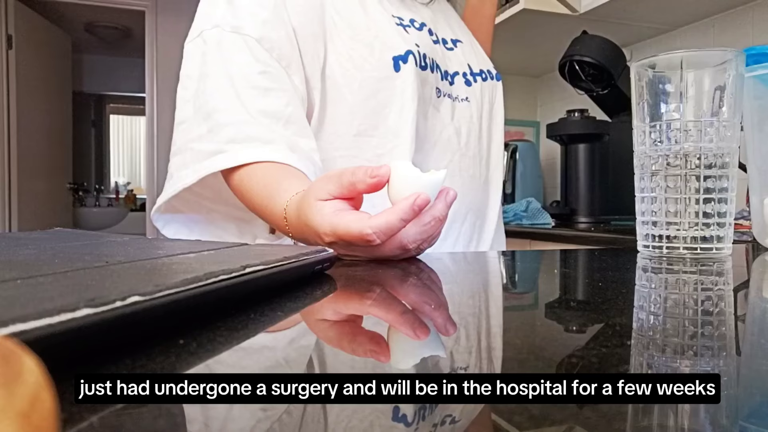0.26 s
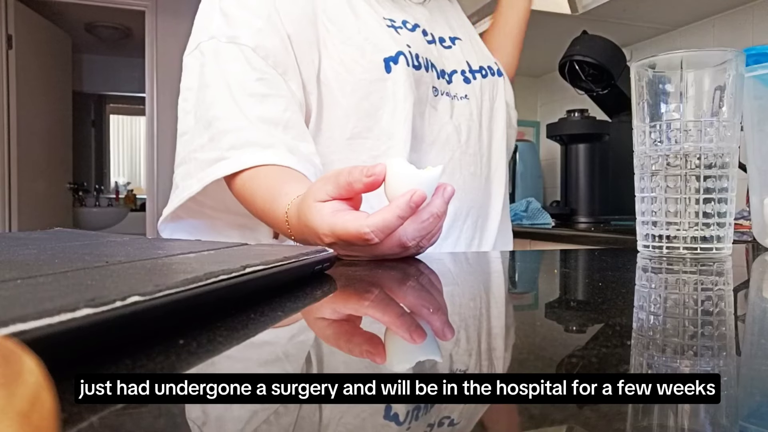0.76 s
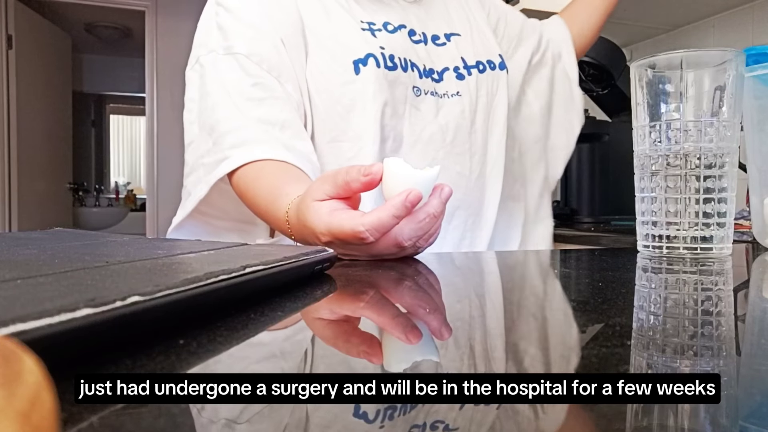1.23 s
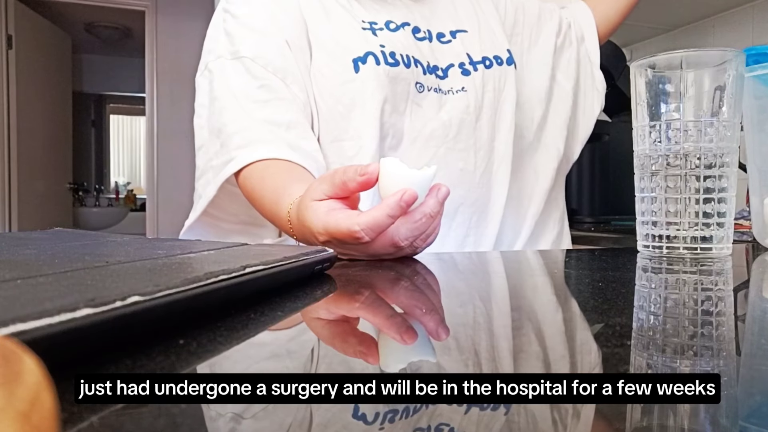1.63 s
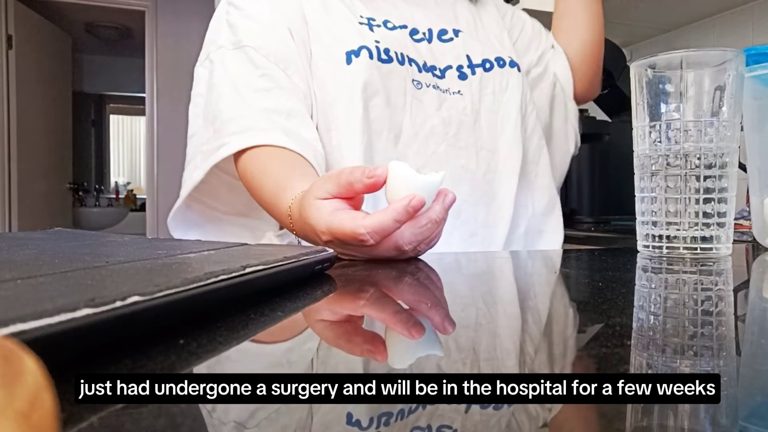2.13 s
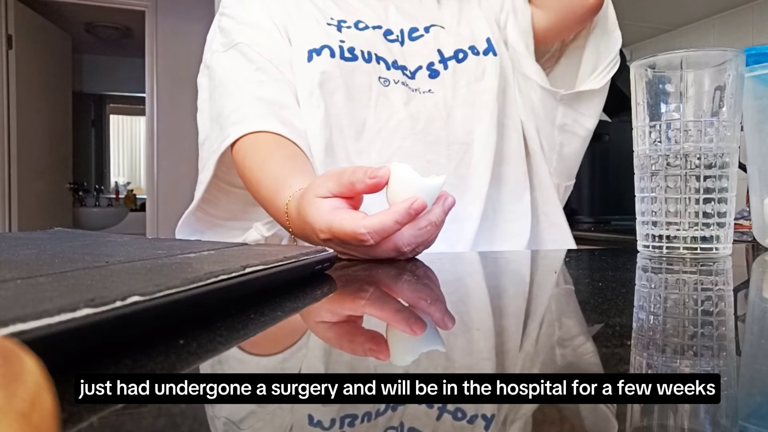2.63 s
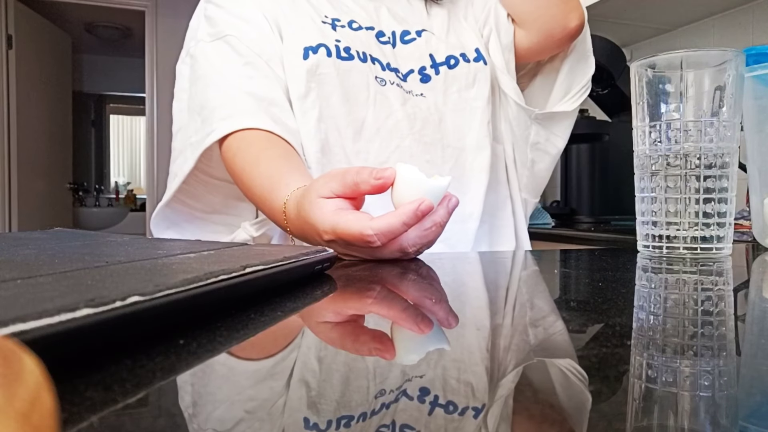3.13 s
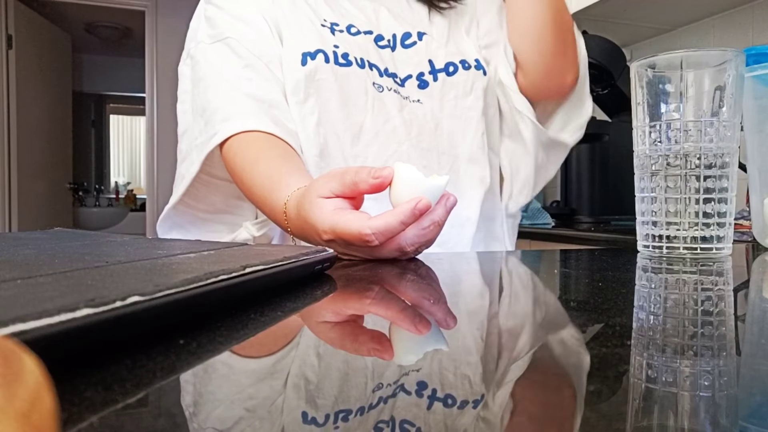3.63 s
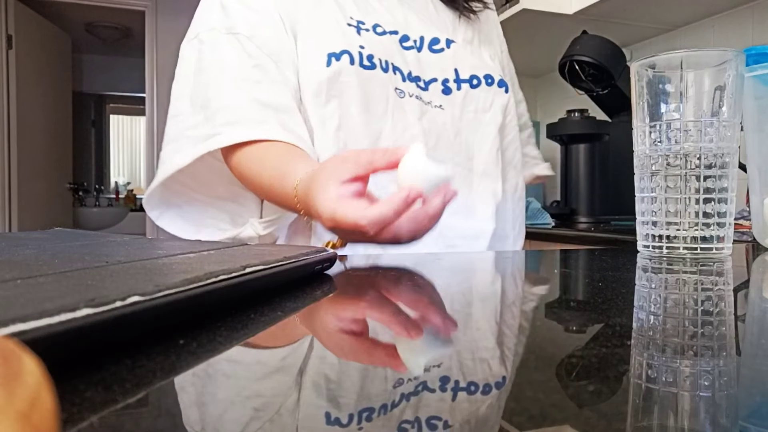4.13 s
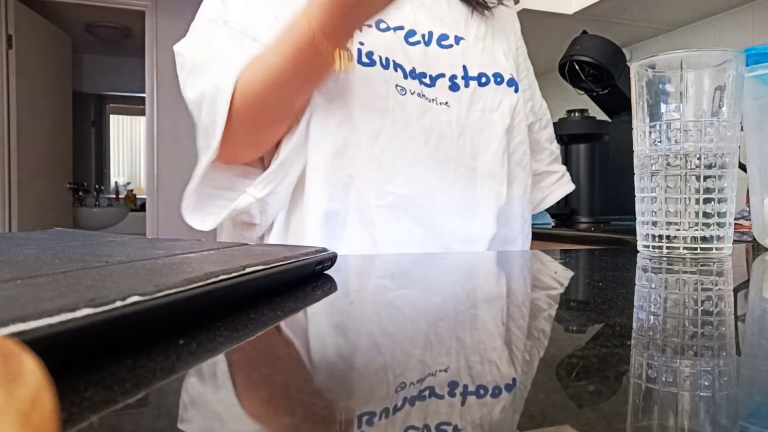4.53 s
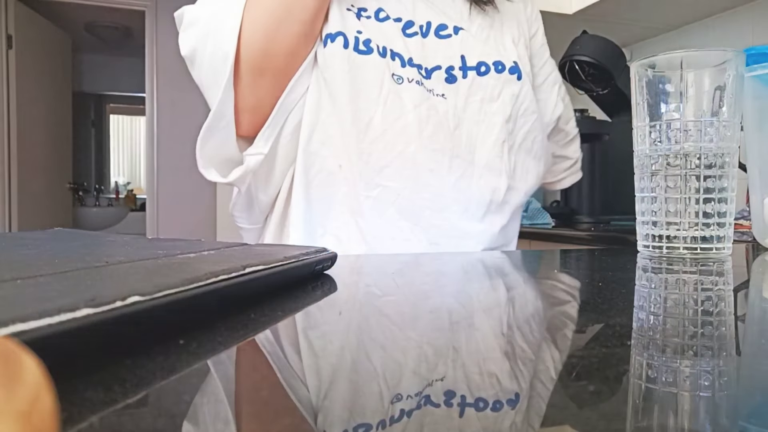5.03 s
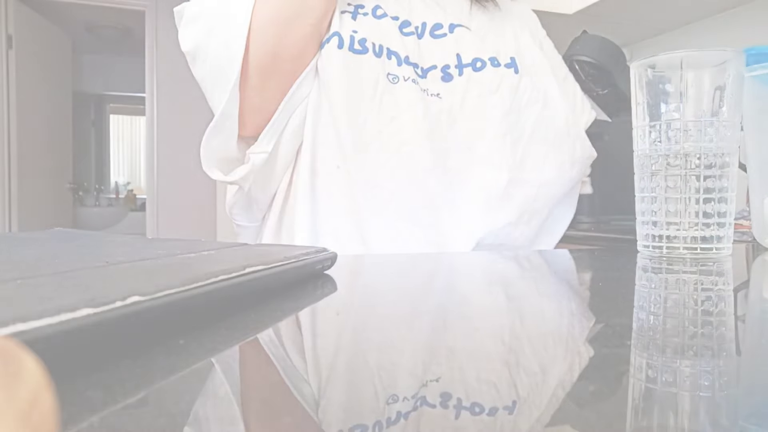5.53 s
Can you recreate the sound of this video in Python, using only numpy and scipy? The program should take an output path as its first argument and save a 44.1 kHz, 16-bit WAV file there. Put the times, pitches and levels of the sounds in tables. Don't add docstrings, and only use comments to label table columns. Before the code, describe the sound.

A quiet kitchen: soft low room air, faint hiss and a far appliance droning weakly, with one tiny tick near 0.3 s. At about 1.2 s come faint touches, then from 1.4 to 1.85 s a cupboard door drags with a gritty rasp, its latch knocks firmly at 1.46, 1.56 and 1.66 s, and the panel thuds low against its frame, ending with a dull thump at 1.82 s. After a short pause a small motor starts around 2.2 s, a low fluttering hum of roughly 28 beats a second. It steps up in speed at about 3.1 s, then hunts slightly, with a wavering casing tone near 310 Hz swelling and breaking off. Faint ticks and soft cloth rubs appear close by, busiest from 4.6 s. By 5.1 s the motor sounds strained, louder, rougher and more rattling, peaking near 5.3 s and easing slightly at the end, around 5.75 s, under a strong sleeve rustle.

```python
import sys
import numpy as np
from scipy import signal
from scipy.fft import rfft, irfft, next_fast_len
from scipy.io import wavfile
from scipy.ndimage import uniform_filter1d

SR = 44100
rng = np.random.default_rng(int(sys.argv[2]) if len(sys.argv) > 2 else 0)


def volts(x):
    e = np.asarray(x, float) / 20
    return 10 ** e


def wav_out(sig):
    wavfile.write(sys.argv[1], SR, np.round(np.clip(np.atleast_2d(sig).T, -1, 1) * 32767).astype(np.int16))


N = 254408


def rms_one(x):
    return x / np.sqrt(np.mean(x ** 2) + 1e-20)


def in_time(rows, silent=-120):
    s, *columns = np.transpose(rows)
    return [np.interp(np.arange(N) / SR, s, c, left=silent) for c in columns]


def swell(s, db, rise_db_s, fall_db_s, bite_db=200):
    t = np.arange(N) / SR - s
    rise_db = abs(rise_db_s) * t
    before_db = rise_db + 20 * np.minimum(rise_db + bite_db, 0)
    return volts(db + np.where(t < 0, before_db, -abs(fall_db_s) * t))


def drift(rate):
    r = np.exp(-80 * np.pi * rate / SR)
    slow = signal.lfilter([1], [1, -2 * r, r * r], rng.standard_normal(N // 40 + 2002))[2000:]
    return np.interp(np.arange(N) / 40, np.arange(len(slow)), rms_one(slow))


def tint(x, points):
    size = next_fast_len(N + SR // 4)
    hz = np.maximum(np.fft.rfftfreq(size, 1 / SR), 1)
    at, db = np.transpose(points)
    return irfft(rfft(x, size) * volts(np.interp(np.log(hz), np.log(at), db)), size)[..., :N]


def resonate(x, hz, width_hz):
    r = np.exp(-np.pi * max(width_hz, 1) / SR)
    poles = [1, -2 * r * np.cos(2 * np.pi * hz / SR), r * r]
    return signal.lfilter([(1 - r * r) / 2, 0, (r * r - 1) / 2], poles, x + 1e-18)


def body(x, modes):
    rings = ((-1) ** k * volts(db) * resonate(x, hz, width) for k, (hz, width, db) in enumerate(modes))
    return rms_one(sum(rings))


def add(out, s, sound):
    i = round(s * SR)
    out[..., i:i + sound.shape[-1]] += sound


# frequency in Hz, side level over middle level in dB.
WIDTH = [(60, -26), (150, -20.5), (380, -7), (950, 2), (2380, 0.5), (5980, 2.5), (15000, 1)]


def spread(x, t60, side_db=0):
    t = np.arange(SR // 2) / SR
    tail = rng.standard_normal(len(t)) * volts(-60 * t / t60)
    echo = signal.fftconvolve(x, tail / np.linalg.norm(tail))[:N]
    side = volts(side_db) * tint(echo, WIDTH)
    return np.array([x + side, x - side])


# frequency in Hz, level in dB per Hz.
AIR = [(15, -43), (25, -9), (97, -7.5), (119, -3), (146, -7.5), (167, -4.5), (189, -15), (209, -14),
       (248, -14.5), (290, -5.5), (350, -7), (468, -13), (659, -19), (1080, -18.5), (1500, -30),
       (1950, -36), (3300, -120)]
# frequency in Hz, level in dB per Hz.
FAR_HISS = [(880, -18.5), (1500, -8), (1950, -4), (2380, -3), (2860, -10.5), (2980, -9), (3590, -10),
            (4280, -20), (5150, -19), (6270, -29), (15600, -21)]
# pitch in Hz, level in dB, waver in dB.
DRONE = [(95.8, -79.5, 5.5), (169.1, -63, -1.5), (247.8, -70, 4), (344, -68, 3.5), (425.4, -74.5, 1.5),
         (1086, -81.5, 6), (2760, -88, -2.5)]


def kitchen():
    air_db, hiss_db = -61, -73
    mid, side = rng.standard_normal((2, N))
    side = tint(side, WIDTH)
    white = np.array([mid + side, mid - side])
    air = volts(air_db) * rms_one(tint(white, AIR))
    air += volts(hiss_db) * rms_one(tint(white, FAR_HISS))
    t = np.arange(N) / SR
    drone = np.zeros(N)
    for hz, db, waver_db in DRONE:
        level = volts(db + 3.5 + waver_db * drift(3.2))
        drone += level * np.sin(2 * np.pi * hz * t + 0.27 * waver_db * drift(0.79))
    return air + spread(drone, t60=0.41)


# frequency in Hz, level in dB per Hz.
CLOTH = [(1760, -37), (3000, -7.5), (4040, -3.5), (4700, -13.5), (5070, -28), (6020, -8.5), (6860, -6),
         (7560, -6.5), (9040, -7.5), (12400, -17), (13500, -8.5), (14800, -7), (15600, -18)]
# peak in seconds, level in dB, rise in dB per s, fall in dB per s.
RUBS = [
    (2.42, -78.5, 71, 68),
    (3.93, -74, 18, 20),
    (4.63, -72.5, 84, 9),
    (4.8, -68, 125, 72),
    (5.1, -79, 1.5, 8),
    (5.44, -66.5, 28.5, 75.5),
    (5.77, -65.5, 16, 7),
]
# start in seconds, peak in dB, pitch in Hz, left over right in dB,
# seconds to fall by 60 dB.
TICKS = [
    (0.288, -63.5, 7240, -11, 0.14),
    (2.6884, -70.5, 8450, 13.5, 0.087),
    (3.3034, -60, 8600, -5.5, 0.054),
    (3.715, -55, 14100, 9, 0.036),
    (4.78, -52.5, 7000, -11, 0.064),
    (4.815, -55, 8800, 12, 0.1),
    (4.9057, -59, 7300, -6, 0.11),
    (5.087, -62.5, 14000, -20, 0.09),
]


def sleeves():
    level_db = 20 * np.log10(np.max([swell(*rub) for rub in RUBS], axis=0))
    white = rng.standard_normal((2, N))
    out = volts(level_db + 2.5 + 1.4 * drift(16)) * rms_one(tint(white, CLOTH))
    sheen = rms_one(resonate(white, 7500, 350) + 0.61 * resonate(white, 6060, 500))
    out += volts(2 * level_db + 64.5) * sheen
    t = np.arange(SR // 8) / SR
    for s, db, hz, pan_db, t60 in TICKS:
        crack = np.diff(rng.standard_normal(len(t) + 1)) * volts(-60 * t / t60)
        tick = 0.5 * resonate(crack, hz, 4500) + 1.34 * resonate(resonate(crack, hz, 1200), hz, 1200)
        sides = volts(np.array([[pan_db / 2], [-pan_db / 2]]))
        add(out, s, volts(db - 2.5) * tick * sides)
    return out


# pitch in Hz, width in Hz, level in dB.
DOOR = [(510, 180, -13), (671, 46, 1.5), (800, 22, -2.5), (863, 33, -0.5), (985, 40, 4), (1097, 24, -1.5),
        (1230, 40, -3), (1584, 38, -24)]
# frequency in Hz, level in dB per Hz.
DRAG_RASP = [(880, -45), (1500, -4.5), (1680, -7.5), (1970, -1.5), (2260, -8.5), (2330, -6), (2680, -1),
             (3090, -13), (3470, -12.5), (4090, -12.5), (5100, -33.5), (6630, -62), (11200, -120)]
DRAG_HISS = [(3060, -34), (5200, -21), (5940, -3.5), (6950, 0.5), (8540, -2), (9580, -7), (11100, -13.5),
             (14200, -9), (15600, -20)]
DRAG_RUMBLE = [(21, -47), (35, -39), (60, -21), (130, 6), (188, -11), (225, 1.5), (296, -11.5), (339, -0.5),
               (470, -14.5), (520, -6.5), (680, -50), (1140, -120)]
# peak in seconds, level in dB, rise in dB per s, fall in dB per s, dullness in dB.
STROKES = [
    (1.24, -64, 413, 65, 11),
    (1.388, -64.5, 1500, 111, -9.5),
    (1.428, -53, 800, 31.5, 4.5),
    (1.47, -38.5, 260, 133, 10),
    (1.463, -52, 900, 139, -4),
    (1.561, -42, 2497, 117, 16),
    (1.585, -56.5, 698, 119, -9.5),
    (1.674, -38, 2500, 200, 21.5),
    (1.814, -43, 2998, 85, 36),
]
# level in dB, share of the dullness lost, share of the fall rate,
# lag in seconds.
LAYERS = [
    (13, 0.81, 1.3, 0),
    (3.5, 1.14, 1.32, 0.0067),
    (0.4, 0.039, 1.14, 0.021),
    (-10, 1.67, 1.59, 0),
]
# start in seconds, peak in dB, pitch in Hz.
KNOCKS = [
    (1.229, -57.5, 2410),
    (1.272, -57, 2250),
    (1.383, -48, 2580),
    (1.463, -32, 2740),
    (1.496, -36.5, 2460),
    (1.5579, -25.5, 2560),
    (1.6625, -29.5, 2540),
]
# start in seconds, peak in dB, pitch in Hz.
THUDS = [
    (1.462, -33, 131),
    (1.656, -30, 74),
    (1.673, -30, 151),
    (1.813, -54, 247),
    (1.825, -30, 73.6),
]
# frequency in Hz, left over right in dB.
DOOR_LEAN = [(60, -1.5), (150, 1), (380, 1.5), (950, -1.5), (2380, 3), (5980, -6), (15000, -4.5)]


def door():
    slips_per_s, grain_db = 2500, 3.0
    bite_db = 19.5
    gains = []
    for layer_db, lost, share, lag_s in LAYERS:
        strokes = (swell(s + lag_s, db + layer_db - lost * dull_db, rise, share * fall, bite_db)
                   for s, db, rise, fall, dull_db in STROKES)
        gains.append(sum(strokes))
    panel, rasp, rumble, hiss = gains

    sizes = volts(grain_db * np.minimum(rng.exponential(1, (2, N)), 3)) * rng.standard_normal((2, N))
    slips = (rng.random((2, N)) < slips_per_s / SR) * sizes
    gritty = slips[1] + .5 * rng.standard_normal(N)
    out = panel * volts(-6.0) * body(slips[0], DOOR)
    out += rasp * volts(-2.5) * rms_one(tint(gritty, DRAG_RASP))
    out += hiss * volts(-1.9) * rms_one(tint(gritty, DRAG_HISS))
    out += rumble * volts(-2.0) * rms_one(tint(rng.standard_normal(N), DRAG_RUMBLE))

    t = np.arange(SR // 4) / SR
    for s, db, hz in KNOCKS:
        burst = rng.standard_normal(len(t)) * np.exp(-t / 0.012)
        ring = resonate(burst, hz, 190)
        ring += 0.88 * resonate(burst, 0.893 * hz, 230) + 0.037 * resonate(burst, 1.4 * hz, 380)
        ring = resonate(ring, hz, 2500)
        add(out, s, volts(db + 0.5) * ring / np.abs(ring).max())
    for s, db, hz in THUDS:
        ring = np.sin(2 * np.pi * hz * t) + 0.18 * np.sin(2 * np.pi * 1.5 * hz * t)
        onset = 1 - np.exp(-t / 0.0016)
        add(out, s, volts(db - 8.0 - 60 * t / 0.28) * ring * onset)

    left, right = spread(out, t60=.25, side_db=-2.5)
    lean = np.array(DOOR_LEAN) * [1, .5]
    return np.array([tint(left, lean), tint(right, lean * [1, -1])])


def scatter(x, gain):
    size = next_fast_len(N + SR)
    z = np.exp(-2j * np.pi * np.fft.rfftfreq(size))
    for lag in (131, 293, 557):
        x = irfft(rfft(x, size) * (z ** lag - gain) / (1 - gain * z ** lag), size)[:N]
    return x


def evened(x, low_hz, high_hz):
    x = signal.sosfilt(signal.butter(2, [low_hz, high_hz], "band", fs=SR, output="sos"), x)
    return x / np.sqrt(uniform_filter1d(x ** 2, size=SR // 6) + 1e-4)


# time in seconds, turns per second.
SPEED = [(2.2, 28.2), (2.43, 27.3), (3.05, 27.5), (3.14, 30.3), (3.21, 32.1), (3.32, 32.1), (3.49, 30.4),
         (3.65, 31.5), (4.17, 31.35), (4.3, 30.85), (4.42, 31.65), (4.6, 31.4), (4.76, 30.6), (4.9, 31.55),
         (5.11, 32.1), (5.21, 31.6), (5.56, 30.9), (5.77, 31.9)]
# time in seconds, level in dB.
EFFORT = [(2.25, -56.5), (2.3, -56.5), (2.52, -50.5), (3.33, -48), (3.39, -45.5), (3.62, -47.5),
          (3.69, -45.5), (4.08, -47), (4.29, -46), (4.37, -48), (4.66, -45.5), (4.88, -46.5), (5.03, -44),
          (5.29, -43.5), (5.31, -41.5), (5.53, -43), (5.74, -47.5), (5.77, -51)]
# reached at in seconds, then base, hum, buzz and rattle in dB over the loudness.
STATES = [
    (2.3, -1.5, -3, -13, -18.5),
    (2.78, -0.5, -1.5, -7, -17.5),
    (3.25, -1, -2.5, -11, -15),
    (5.1, -4, -3.5, -7, -9.5),
]
STATE_NOISE = (.25, .08, .33, .5)
# pitch in Hz, width in Hz, level in dB.
BASE_MODES = [(65.3, 46, -5.5), (99.4, 33, 2), (112.6, 13.2, 5), (128, 9.8, 3), (154.7, 13, 9),
              (187.8, 5.5, -5)]
HUM_MODES = [(245.2, 7.3, 6.5), (286.6, 24, 0), (297, 9.1, -34), (322.3, 6, -2.5), (345.6, 17, 2.5),
             (384, 9, -37), (387.4, 6, 5.5), (415, 18, 3), (433, 14, -1.5)]
BUZZ_MODES = [(453, 26, -2.5), (538, 41, 2.5), (586, 36, 3), (618.6, 42, -0.5), (676, 18, -5),
              (712, 29, -4.5)]
RATTLE_MODES = [(794, 25.7, 5), (884.5, 25, 1.5), (950, 130, -6), (1111, 153, -9), (1207, 32, -6),
                (1365, 680, -18.5), (1850, 300, -14.5), (2360, 520, -18), (2650, 920, -21.5)]
EDGES_HZ = (45, 205, 450, 750, 3300)
SWELL_SHARE = (1.8, 1.8, 0.97, 0.71)
# peak in seconds, level in dB, rise in dB per s,
# fall in dB per s.
SINGING = [
    (3.42, -50, 31, 200),
    (3.82, -46.5, 42, 35),
    (4.26, -46, 8, 200),
    (4.66, -43, 31, 200.5),
    (5.03, -45, 36, 95),
]


def motor():
    uneven_db, change_s = 4.0, 0.17
    speed, = in_time(SPEED, silent=0)
    states = np.column_stack([STATES, STATE_NOISE])
    held = [(after[0] - change_s, *now[1:]) for now, after in zip(states[1:], states[2:])]
    *colour_db, load = in_time(sorted([(0, *states[0, 1:]), *map(tuple, states), *held]))

    turns = np.cumsum(speed) / SR
    beats = np.diff(np.floor(turns), prepend=0) * volts(uneven_db * load * rng.standard_normal(N))
    puff = load * rng.standard_normal(N) * (.6 + np.exp(-3.0 * (turns % 1))) / 30

    level_db, = in_time(EFFORT, silent=EFFORT[0][1])
    quick_db = level_db - uniform_filter1d(level_db, size=SR // 2, mode="nearest")
    levels_db = level_db + np.array(colour_db) + np.outer(np.array(SWELL_SHARE) - 1, quick_db)

    singing = np.max([swell(*row) for row in SINGING], axis=0) * volts(3.0 + 1.0 * drift(15))
    out = singing * np.sin(20 * np.pi * turns + 2.14 + 1.13 * drift(2.9))
    groups = (BASE_MODES, HUM_MODES, BUZZ_MODES, RATTLE_MODES)
    blurs = (1.2, 1.3, 2.2, 4)
    for db, modes, blur, low, high in zip(levels_db, groups, blurs, EDGES_HZ, EDGES_HZ[1:]):
        out += volts(db) * evened(body(beats + blur * puff, modes), low, high)
    running = np.clip((np.arange(N) / SR - SPEED[0][0]) * 10, 0, 1)
    return scatter(running * out, gain=.4)


def scene():
    return kitchen() + sleeves() + door() + spread(motor(), t60=.5)


def band_limit(x):
    return signal.sosfilt(signal.butter(12, 15740, fs=SR, output="sos"), x)


def record(dry):
    x = signal.sosfilt(signal.butter(4, 42, "high", fs=SR, output="sos"), dry)
    x = signal.sosfilt(signal.cheby2(20, 45, 15950, fs=SR, output="sos"), x)
    return band_limit(x)


dry = scene()
out = record(dry)
wav_out(out)
```